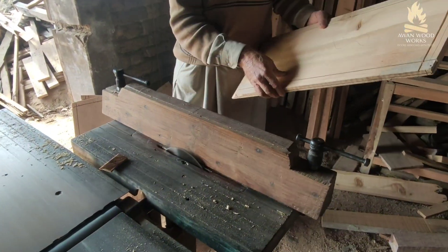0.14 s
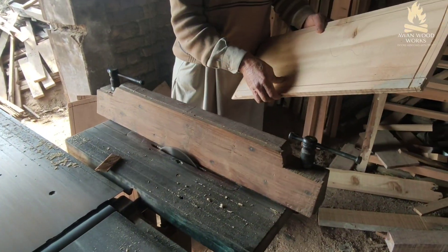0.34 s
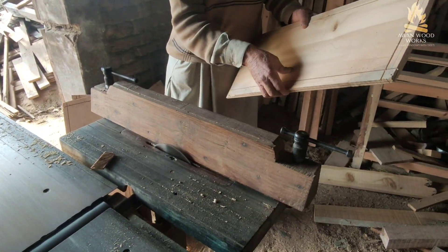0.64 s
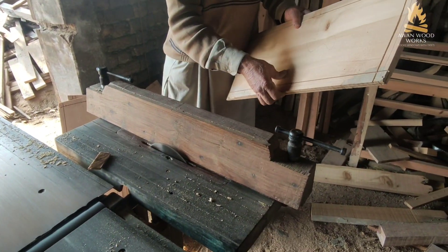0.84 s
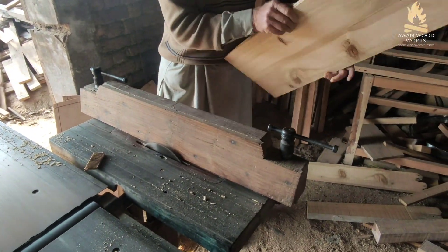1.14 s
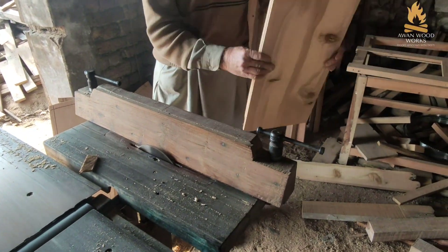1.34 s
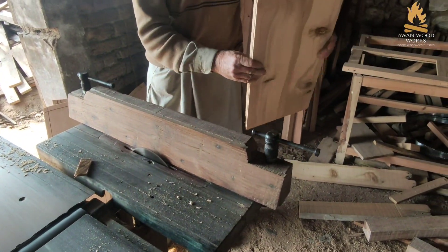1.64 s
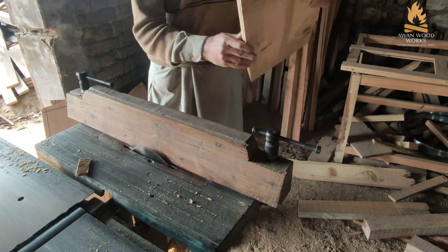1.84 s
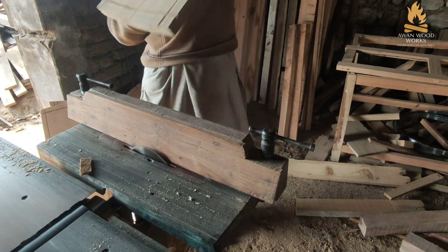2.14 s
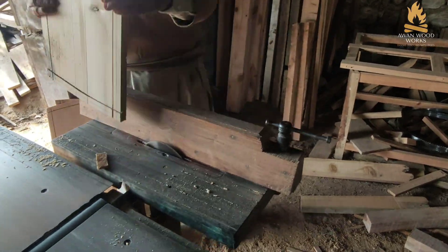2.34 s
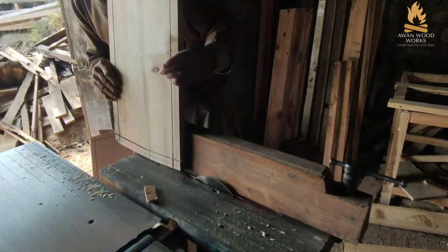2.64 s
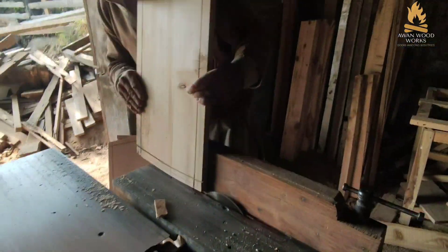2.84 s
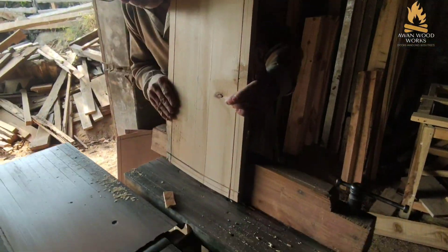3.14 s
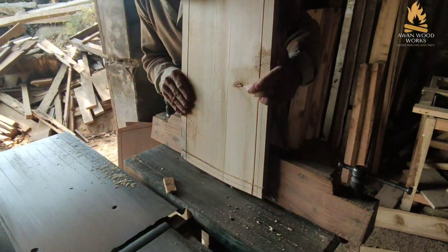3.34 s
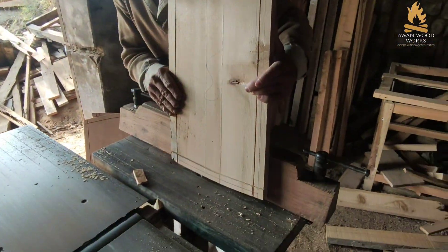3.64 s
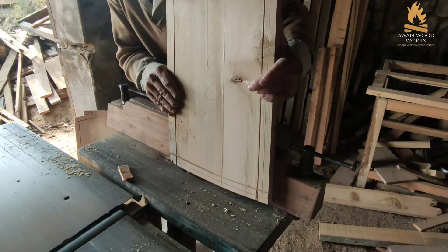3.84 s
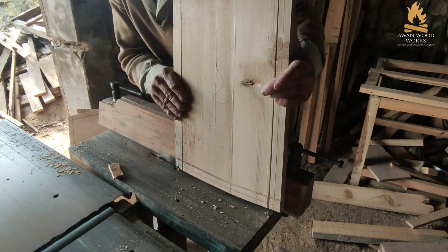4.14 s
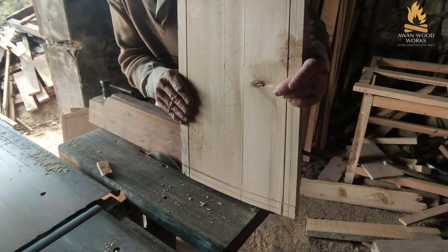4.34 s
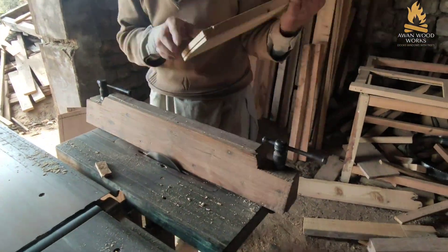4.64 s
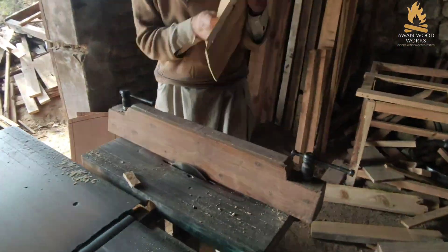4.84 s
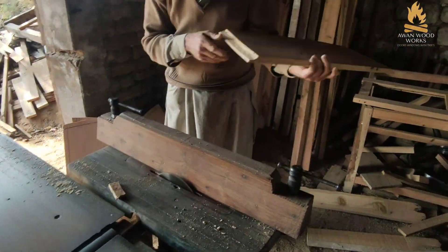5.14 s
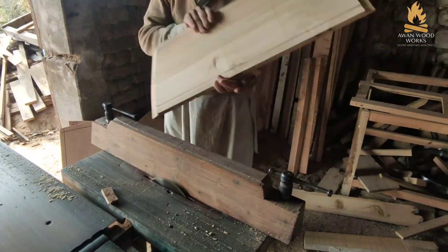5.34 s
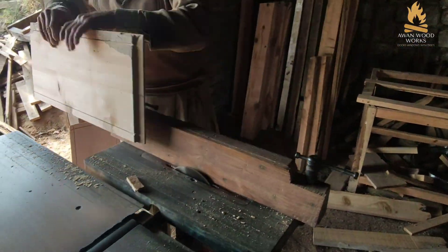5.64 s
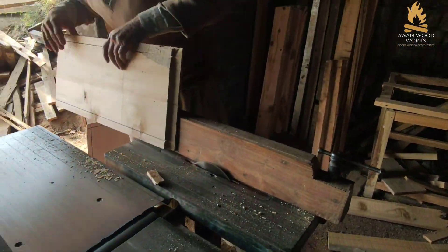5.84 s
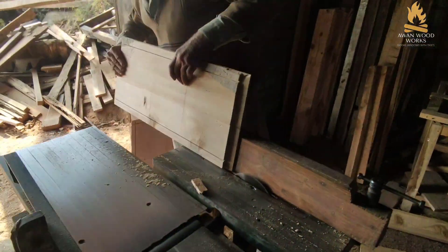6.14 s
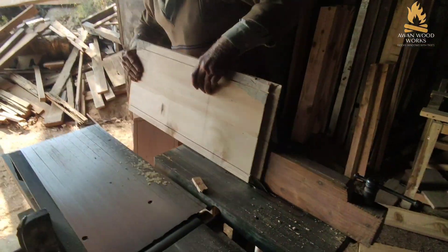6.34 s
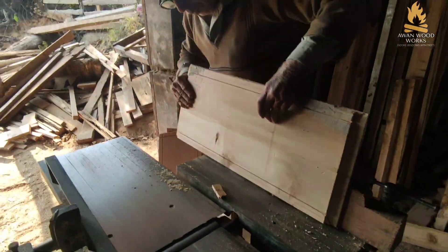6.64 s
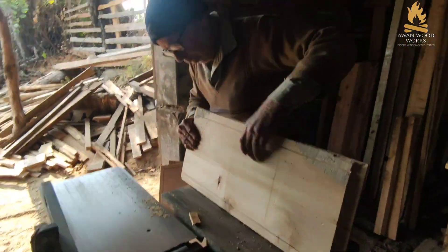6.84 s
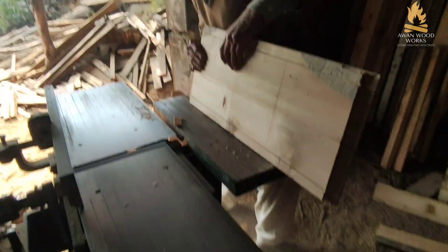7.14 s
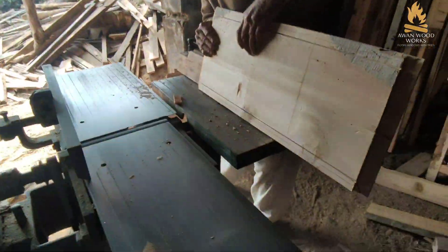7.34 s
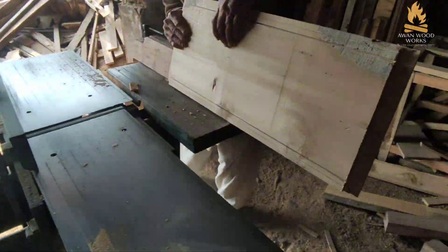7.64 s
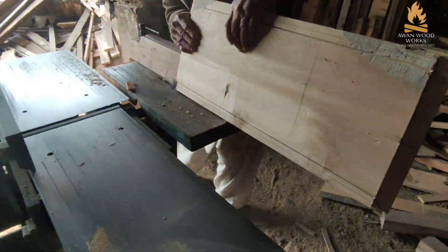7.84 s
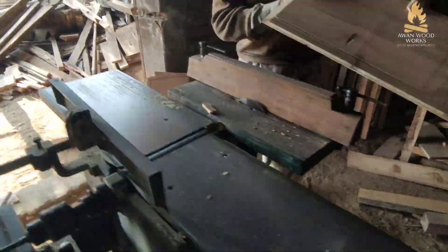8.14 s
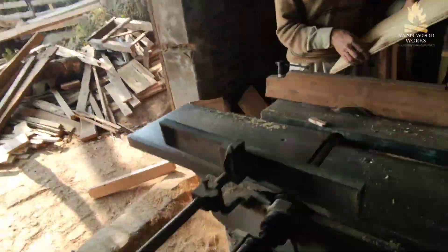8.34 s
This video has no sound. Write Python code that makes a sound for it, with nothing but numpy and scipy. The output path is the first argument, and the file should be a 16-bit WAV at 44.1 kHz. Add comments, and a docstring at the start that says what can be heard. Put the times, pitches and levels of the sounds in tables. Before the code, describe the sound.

A jointer hums steadily and flutters in an open shed; two wooden panel passes sag its pitch and add hissing, ringing planing.

```python
"""An open wood shed, where the three-knife cutter block of a jointer hums, whirrs and ticks faintly.
Twice a panel is pushed over it: the load slows the motor, chips hiss, and the panel sings and rings.
Shaft tones are sine waves; the air, the cut and the ticks are shaped noise. As in sped-up playback,
slices of about 28 ms cross-fade, so the hum flutters where two slices disagree."""
import sys
import numpy as np
from scipy import signal
from scipy.fft import rfft, irfft, next_fast_len
from scipy.io import wavfile
from scipy.ndimage import uniform_filter1d, map_coordinates

SR = 44100
rng = np.random.default_rng(int(sys.argv[2]) if len(sys.argv) > 2 else 0)


def bounce(signal):
    """Save signal as a 16-bit WAV file at the path given by the first command-line argument."""
    frames = np.transpose(np.atleast_2d(signal))
    limited = np.clip(frames, -1, 1)
    pcm = np.round(limited * 32767).astype(np.int16)
    wavfile.write(sys.argv[1], SR, pcm)


N = 374842

# the two panel passes, each a list of: t/s, chip hiss level/dB,
# base level of the panel's upper range/dB, base level of its lower range/dB
PANEL_PASSES = [
    [(2.97, -41, -44, -44), (3.06, -42, -46.5, -51), (3.18, -43.5, -51, -48), (3.28, -43, -44, -45),
     (3.52, -42.5, -46, -45.5), (3.8, -41, -47.5, -49), (3.94, -40.5, -43.5, -44), (4.15, -41, -47, -44.5),
     (4.375, -41, -42.5, -44.5)],
    [(6.295, -44.5, -45, -54), (6.4, -38, -44.5, -41.5), (6.56, -37, -35.5, -32.5), (6.7, -37, -39.5, -43),
     (6.95, -37.5, -35, -34), (7.3, -36, -36, -41), (7.55, -37.5, -35.5, -39.5), (7.68, -36, -42, -45),
     (7.76, -43.5, -39, -44.5), (8.005, -42, -43.5, -39)],
]


def amp(db):
    """Turn decibels into a plain gain."""
    return 10 ** (np.asarray(db) / 20)


def unit(x):
    """Scale a signal to an average (rms) strength of 1."""
    return x / np.sqrt(np.mean(x ** 2) + 1e-20)


def curves(rows):
    """Draw straight lines between table rows: one value per sample for each column after the time."""
    s, *columns = np.transpose(rows)
    return [np.interp(np.arange(N) / SR, s, column) for column in columns]


def filtered(x, response):
    """Multiply the spectrum of x by a gain that depends on frequency."""
    m = next_fast_len(N + 8192)
    gain = response(np.fft.rfftfreq(m, 1 / SR))
    return irfft(rfft(x, m) * gain, m)[..., :N]


def wobble(rate):
    """A smooth random curve through `rate` random points a second."""
    points = rng.standard_normal(int(N * rate / SR) + 4)
    return map_coordinates(points, [np.arange(N) * rate / SR])


def swell(start, end):
    """The samples of a spell and an envelope that rises and falls roundly over it."""
    span = slice(round(start * SR), round(end * SR))
    shape = np.abs(np.sin(np.linspace(0, np.pi, span.stop - span.start))) ** .5
    return span, shape


def rush(spectrum, patchy_db, source=None):
    """Coloured noise of rms 1, from a given or a fresh white source, with patches of random gain."""
    white = rng.standard_normal(N) if source is None else source
    z = signal.stft(white, nperseg=512)[2]
    patches = uniform_filter1d(rng.standard_normal(z.shape), size=2, axis=0)  # across frequency
    patches = uniform_filter1d(patches, size=18, axis=1)  # along time
    noise = signal.istft(z * amp(patchy_db * unit(patches)), nperseg=512)[1][:N]
    f, db = np.transpose(spectrum)

    def colour(hz):
        return amp(np.interp(np.log(hz + 1), np.log(f + 1), db, -120, -120))
    return unit(filtered(noise, colour))


def slices():
    """Per sample the slice number and the share of the next; per slice the shaft turns skipped so far."""
    # seams where the knife tone dips deeply: t/s, depth/dB; chance plays the shallower ones
    dip_rows = [(0.215, -30.0), (1.153, -24.0), (1.175, -17.0), (1.266, -12.0), (1.494, -30.0),
                (1.894, -13.0), (2.234, -12.0), (2.26, -11.0), (2.462, -12), (2.66, -26.0), (2.74, -29.5),
                (2.803, -9.5), (2.939, -23.0), (2.962, -19.0), (3.0, -21), (3.048, -20), (3.121, -11.0),
                (3.775, -14.0), (3.959, -12), (3.989, -15.5), (4.484, -12.0), (4.503, -20.5),
                (4.594, -12.0), (4.675, -13.5), (4.82, -18.0), (4.88, -22.0), (5.11, -12.5), (5.248, -12.0),
                (5.339, -13.5), (5.455, -12.0), (5.588, -11.5), (5.736, -22.5), (5.827, -28.0),
                (5.913, -30.5), (6, -17.5), (6.231, -13.0), (6.41, -18), (6.691, -13.5), (6.728, -22.5),
                (6.784, -9.5), (6.848, -29), (7.161, -10.0), (7.212, -27.5), (7.257, -21), (7.422, -17.5),
                (7.594, -13.5), (7.965, -12.5), (8.434, -11), (8.456, -9.5)]
    slice_s, first_s = .028465, .01393
    grid = first_s + slice_s * np.arange(-1, N / SR / slice_s + 2)
    draw = rng.random((len(grid), 4))
    dips, dip_db = np.transpose(dip_rows)
    free = np.abs(grid[:, None] - dips).min(1) > .016  # regular seams clear of the deep dips
    jittered = grid + .006 * (draw[:, 0] - .5)
    seams = np.r_[jittered[free], dips]
    # an even blend of two tones p periods apart keeps cos(pi p) of the strength
    deep = np.arccos(np.clip(amp(dip_db), 0, 1)) / np.pi
    sign = np.where(draw[:len(dip_rows), 2] < .64, -1, 1)
    periods = np.r_[.78 * (draw[free, 1] - .5), deep * sign]  # of the knife tone
    order = np.argsort(seams)
    # whole knife periods leave the knife tone alone but shift the other shaft tones
    whole_periods = np.floor(3 * draw[np.arange(len(seams)) % len(grid), 3])
    skip = np.cumsum(np.r_[0, periods[order] + whole_periods, 0]) / 3  # three knives per turn
    place = np.interp(np.arange(N) / SR, seams[order], np.arange(len(seams))) + .5
    share = np.clip(.5 + 1.45 * (place % 1 - .5), 0, 1)
    return place.astype(int), share, skip


def bite(turns, index, share, skip, renew_hz, fresh):
    """White force of the nicked edges: it repeats every turn, gradually renews and is partly fresh noise."""
    age = np.arange(N) / SR * renew_hz
    edge = rng.standard_normal((int(age[-1]) + 2, 640))  # one row is one turn's pattern
    old = np.cos(age % 1 * np.pi / 2)
    new = np.sin(age % 1 * np.pi / 2)
    row = age.astype(int)

    def seen(k):
        angle = ((turns + skip[k]) % 1 * edge.shape[1]).astype(int) % edge.shape[1]
        return old * edge[row, angle] + new * edge[row + 1, angle]
    repeating = (1 - share) * seen(index) + share * seen(index + 1)
    return np.sqrt(1 - fresh) * repeating + np.sqrt(fresh) * rng.standard_normal(N)


def ticks():
    """Faint ticks in the machine: puffs of noise that start sharply and die away exponentially."""
    # set ticks: t/s, approximate peak level/dB
    set_ticks = [(0.8757, -39), (6.1535, -41)]
    # colour of the ticks: f/Hz, relative level/dB per Hz
    tick_colour = [(1500, -25), (2400, -4), (4800, -4), (7600, 0)]
    ticks_per_s, strongest_db, t60_s = 14, -57, .05  # chance ticks; time to fall by 60 dB
    strength = amp(strongest_db - 2.2 * rng.exponential(size=N))
    hits = strength * (rng.random(N) < ticks_per_s / SR)
    for s, db in set_ticks:
        hits[round(s * SR)] = amp(db - 12)  # noise peaks stand about 12 dB above its rms
    envelope = signal.lfilter([1], [1, -amp(-60 / (t60_s * SR))], hits)
    return envelope * rush(tick_colour, patchy_db=0)


def whirr(force, flicker):
    """Knives beat the air: rumble, body and treble; the body repeats with the shaft, the upper two flicker."""
    # air and bearing noise: t/s, level of the body before flicker/dB
    body_level = [(0, -53), (2.9, -53.5), (4.4, -52.5), (6.2, -54), (8.05, -50), (8.3, -50), (8.38, -55)]
    # colours of the three parts: f/Hz, relative level/dB per Hz
    rumble_colour = [(25, -48.5), (60, -24.5), (120, -1.5), (320, -1.5), (680, 1.5), (800, -3), (960, -1),
                     (1060, -8.5), (1200, -6), (1290, -26.5)]
    body_colour = [(1100, -29.5), (1300, -13.5), (1410, -9), (1530, -11), (1730, -7), (2250, -7.5),
                   (2440, -11), (3500, -15.5), (4200, -33)]
    treble_colour = [(3000, -32.5), (3400, -7.5), (4900, -7.5), (5650, -10), (5900, -2.5), (6670, -1),
                     (7550, -5), (7800, -8)]
    rumble_db, treble_db = -43, -59  # base levels
    body_db, = curves(body_level)
    swing_db = body_db - body_db.mean()  # the other parts follow the body's level
    rumble = amp(rumble_db + 0.33 * swing_db) * rush(rumble_colour, patchy_db=0)
    body = amp(body_db + 0.34 * flicker) * rush(body_colour, 0.63, force)
    treble_gain = amp(treble_db + 0.77 * swing_db + 0.85 * flicker)
    return rumble + body + treble_gain * rush(treble_colour, patchy_db=.5)


def ringing(force):
    """The bite drives one resonance of the panel or the knives, at a fixed pitch, for each spell."""
    # spells: start/s, end/s, f/Hz, rms level at the height of the envelope/dB
    spells = [(2.965, 3.05, 2650, -51), (2.965, 3.06, 3500, -54), (3.2, 3.45, 1640, -49),
              (3.76, 3.9, 6150, -49), (4.22, 4.39, 1660, -48), (4.2, 4.39, 3100, -51),
              (4.28, 4.39, 6400, -47), (6.295, 6.4, 3200, -48), (6.295, 6.42, 5250, -50),
              (6.295, 6.42, 6000, -45), (6.47, 6.6, 6000, -43), (6.5, 6.62, 4400, -50),
              (6.68, 6.86, 7200, -44), (6.87, 7.08, 1550, -43), (7.0, 7.36, 3400, -47),
              (7.15, 7.38, 5950, -42), (7.22, 7.38, 4500, -48), (7.33, 7.43, 7050, -42),
              (7.7, 8.02, 6250, -47), (7.73, 7.88, 2200, -45), (7.78, 7.9, 4050, -49)]
    width_hz, chatter_db, chatter_per_s = 200, 2.5, 25  # each ring is broad and chatters in level
    out = np.zeros(N)
    for start, end, hz, db in spells:
        span, shape = swell(start, end)
        edges = [hz - width_hz / 2, hz + width_hz / 2]
        band = signal.butter(1, edges, 'band', fs=SR, output='sos')
        ring = signal.sosfilt(np.r_[band, band], force[span])  # the same band filter twice
        chatter = amp(chatter_db * wobble(chatter_per_s)[span])
        out[span] += amp(db) * shape * unit(chatter * ring)
    return out


def planing(force, flicker):
    """The bite sounds as chip hiss, tearing and rasp, and makes the panel boom and ring."""
    # colours of the five parts: f/Hz, relative level/dB per Hz
    hiss_colour = [(5500, -21), (5800, -13), (5980, -4), (6280, 1.5), (6750, -5.5), (7130, 0), (7520, 1.5),
                   (7800, -11)]
    tearing_colour = [(2400, -46), (2700, -5.5), (3100, 2), (3800, 0), (4150, -2.5), (4450, 0.5),
                      (4900, -4.5), (5250, 0), (5800, -7.5), (6100, 3.5)]
    rasp_colour = [(1500, -27), (1850, -11.5), (2250, 3.5), (2700, -7), (3200, -11.5)]
    boom_colour = [(25, -30), (140, -2), (300, 3), (600, -7.5), (880, 2.5), (1200, -7), (1500, -31.5)]
    ring_colour = [(1150, -11.5), (1350, -6.5), (1560, -1.5), (1750, -10.5), (2000, -27)]
    # per pass: tearing/dB and rasp/dB over the upper range, boom/dB and ring/dB over the lower range
    mix_levels = [(-5.5, -9, -3, -6), (-2, -8, -3.5, -8)]
    drift_db, drift_per_s = 1.2, 6  # each of the four wanders on its own as the grain changes
    hiss_db, upper_db, lower_db = curves([row for rows in PANEL_PASSES for row in rows])
    mix_rows = [(row[0], *levels) for rows, levels in zip(PANEL_PASSES, mix_levels)
                for row in (rows[0], rows[-1])]
    colours = tearing_colour, rasp_colour, boom_colour, ring_colour
    tearing, rasp, boom, ring = (
        amp(db + drift_db * wobble(drift_per_s)) * rush(colour, 1.6, force)
        for db, colour in zip(curves(mix_rows), colours))
    hiss = amp(hiss_db) * rush(hiss_colour, 3, force)
    upper = amp(upper_db) * (tearing + rasp)
    lower = amp(lower_db) * (boom + ring)
    return amp(1.34 * flicker) * (hiss + upper + lower)


def hum(turns, cutting, index, share, skip):
    """Shaft tones: each slice starts at another shaft angle, and the fade blends two neighbouring slices."""
    # knife tone, sinking while a panel covers the block: t/s, peak level before scatter and seams/dB
    knife_level = [(2.93, -19), (2.98, -20), (4.4, -20.5), (4.6, -18.5), (6.3, -18), (6.5, -27),
                   (7.4, -30.5), (7.65, -22.5), (8, -23.5), (8.25, -18.5)]
    # pitches of the other shaft tones: multiple of the shaft rate (the knife tone is the third)
    multiples = [5, 6, 8, 9, 9.6, 12, 15, 17.24, 18, 21, 21.8, 23.6, 24.2, 25, 27, 28.6]
    # one row per multiple: relative idle level/dB, change added in the cut/dB
    shaft_levels = [(-29, -7), (-19.5, -2.5), (-37, -1), (-24, -0.5), (-34.5, -4.5), (-33.5, -5.5),
                    (-41.5, 0), (-44, -4.5), (-43, -2.5), (-45.5, -3), (-39, -15), (-42, -7), (-46.5, 2),
                    (-48, -6), (-43, -4.5), (-37, -9.5)]
    # shared level of those tones, fading late in the long pass: t/s, level/dB
    others_level = [(0, -19), (6, -20), (6.9, -22), (7.4, -28), (7.65, -35), (8.25, -20)]
    # a bearing whine on the top multiple comes and goes: t/s, added level/dB
    whine_level = [(.3, -6), (.5, 2.5), (.7, -14), (1.1, 4), (1.5, -4), (1.85, 0), (2.7, -11.5), (4.5, 3.5),
                   (4.9, 2), (5.3, -14)]
    # spells in which the panel sings: start/s, end/s, multiple of the shaft rate, peak level before scatter/dB
    singing = [(2.965, 3.06, 8, -42), (2.965, 3.05, 14, -43), (3.1, 3.95, 7, -45.5), (3.18, 3.897, 12, -43),
               (3.2, 3.46, 20, -42.5), (6.4, 6.525, 8, -37.5), (6.44, 6.63, 20.4, -36.5),
               (6.45, 7.447, 6, -42), (6.55, 7.3, 9, -46.5), (6.85, 7.06, 40, -44), (6.9, 7, 16, -38),
               (6.92, 7.047, 29, -39), (6.926, 7.485, 11, -41.5), (6.95, 7.714, 20, -41.5),
               (7, 7.5, 12, -46), (7.15, 7.612, 2, -41)]
    waver_db, waver_per_s = 1.3, 4  # each of the other shaft tones swells and fades slowly
    slip_cycles = .19  # random slip per slice of steady tones: the sung ones and the knife tone's octave
    beside_db = -14.5  # the panel's resonance also lifts the neighbouring multiples

    def tone(multiple, scatter_db, span=slice(None), steady=False):
        size = amp(scatter_db * rng.standard_normal(len(skip)))  # each slice has its own level
        if steady:
            slip = np.cumsum(slip_cycles * rng.standard_normal(len(skip)))
        else:
            slip = multiple * skip

        def seen(k):
            return size[k] * np.sin(2 * np.pi * (multiple * turns[span] + slip[k]))
        return (1 - share[span]) * seen(index[span]) + share[span] * seen(index[span] + 1)

    knife = amp(curves(knife_level)[0]) * tone(3, scatter_db=.4)
    whine_db, = curves(whine_level)
    others = np.zeros(N)
    for k, (db, cut_db) in zip(multiples, shaft_levels):
        level_db = db + cut_db * cutting + waver_db * wobble(waver_per_s)
        if k == multiples[-1]:
            level_db = level_db + whine_db
        others += amp(level_db) * tone(k, scatter_db=1.84, steady=k == multiples[1])
    out = knife + amp(curves(others_level)[0]) * others
    for start, end, k, db in singing:
        span, shape = swell(start, end)
        beside = amp(beside_db) * (tone(k - 1, 4, span) + tone(k + 1, 4, span))
        out[span] += amp(db) * shape * (tone(k, 2, span, steady=True) + beside)
    return out


def scene():
    """Turn the shaft, join the slices and add up all the sounds."""
    # the load slows the motor: t/s, knife rate f/Hz
    speed = [(0, 240.5), (3, 240.3), (3.15, 235.5), (3.45, 233.3), (3.75, 235.5), (4.05, 239.2),
             (4.5, 240.2), (6.32, 240), (6.5, 222), (6.7, 215.6), (7.1, 219), (7.3, 225), (7.7, 233.5),
             (7.85, 238), (8.5, 240)]
    index, share, skip = slices()
    turns = np.cumsum(curves(speed)[0]) / SR / 3  # shaft turns so far
    t = np.arange(N) / SR
    cutting = np.zeros(N)  # 1 while a panel is on the block
    for rows in PANEL_PASSES:
        start, end = rows[0][0], rows[-1][0]
        cutting += np.interp(t, [start - .012, start, end, end + .02], [0, 1, 1, 0])
    chance = rng.standard_normal(len(skip))
    flicker = (1 - share) * chance[index] + share * chance[index + 1]
    seam_gain = (share ** 2 + (1 - share) ** 2) ** .4  # unrelated noises lose power where they blend
    force = bite(turns, index, share, skip, renew_hz=10, fresh=.28)
    machine = ticks() + seam_gain * whirr(force, flicker)
    panel = ringing(force) + cutting * planing(force, flicker)
    return (machine + panel + hum(turns, cutting, index, share, skip))[None]


def record(dry):
    """The top rolls off steeply, by 40 dB just under the band limit, and nothing passes beyond it."""
    roll_hz, top_hz = 7510, 7660

    def response(hz):
        return (hz < top_hz) * amp(-40 * np.clip((hz - roll_hz) / (top_hz - roll_hz), 0, 1))
    return filtered(dry, response)


dry = scene()
out = record(dry)
bounce(out)
```